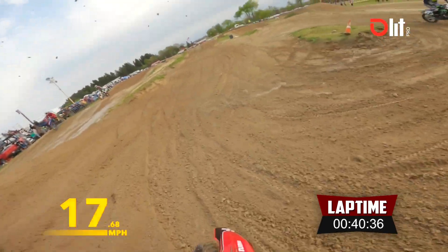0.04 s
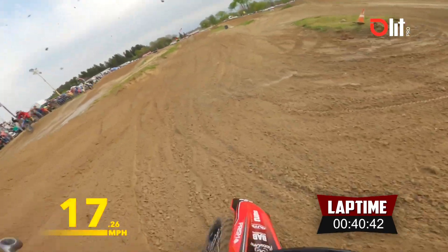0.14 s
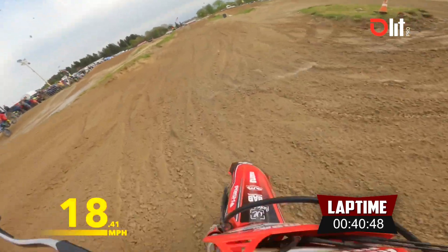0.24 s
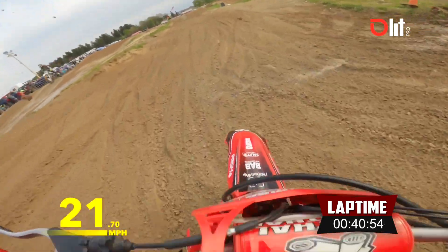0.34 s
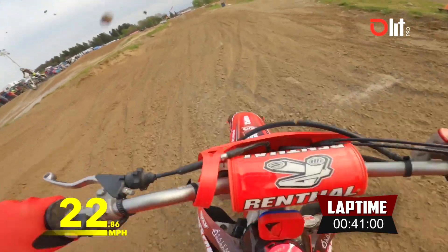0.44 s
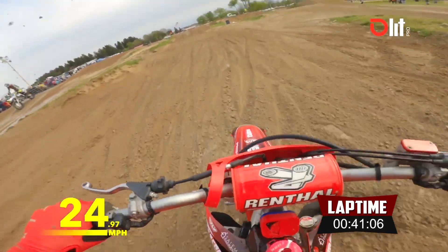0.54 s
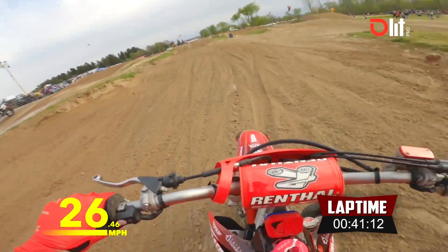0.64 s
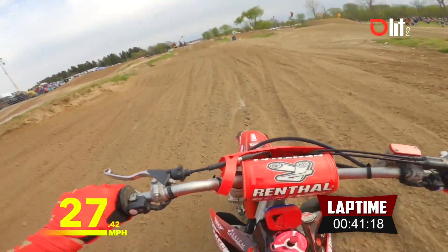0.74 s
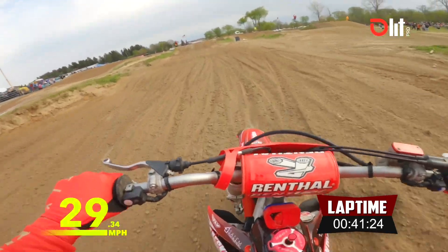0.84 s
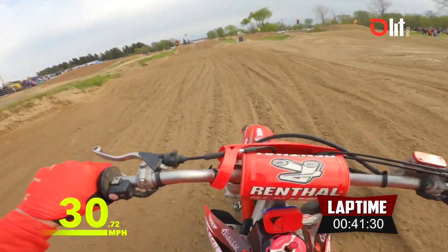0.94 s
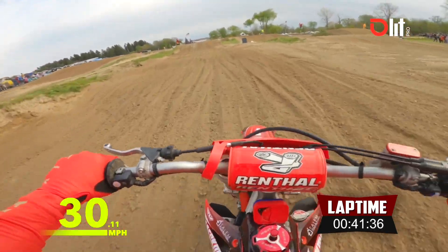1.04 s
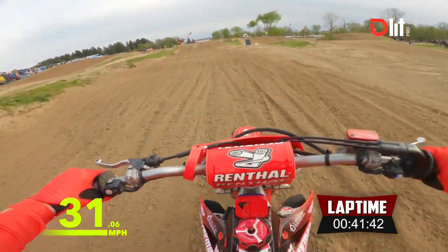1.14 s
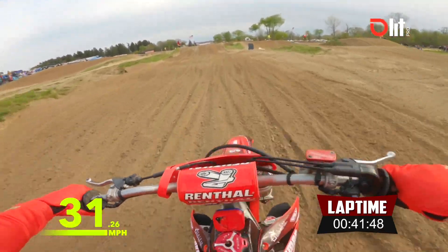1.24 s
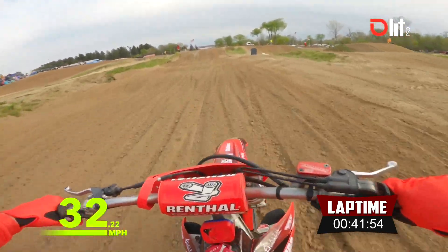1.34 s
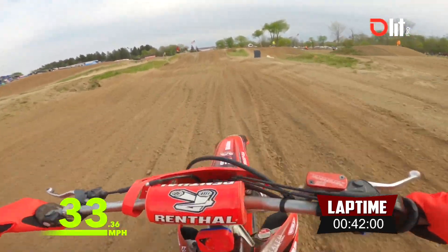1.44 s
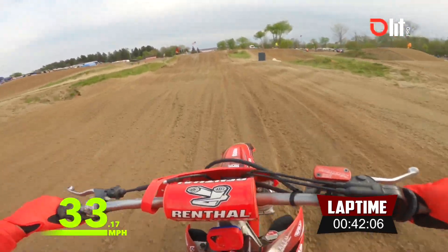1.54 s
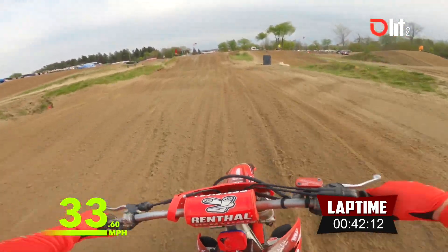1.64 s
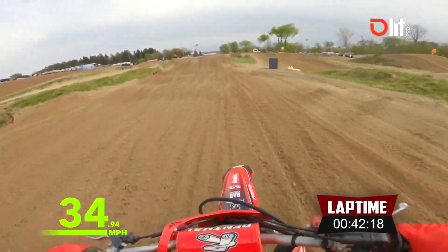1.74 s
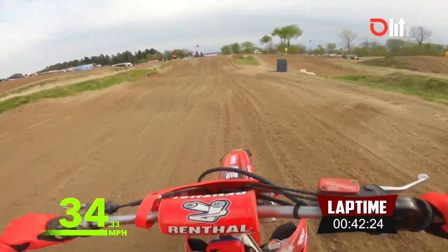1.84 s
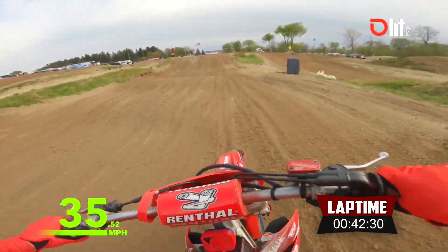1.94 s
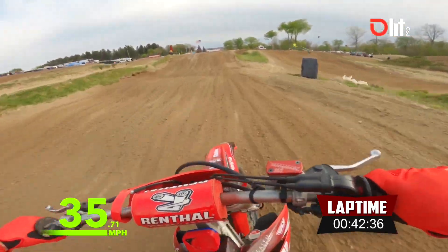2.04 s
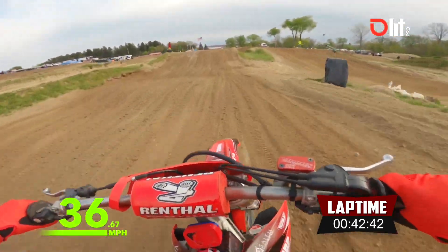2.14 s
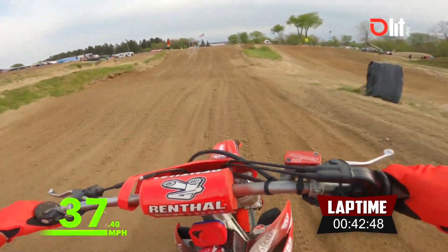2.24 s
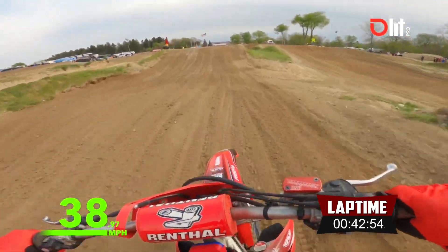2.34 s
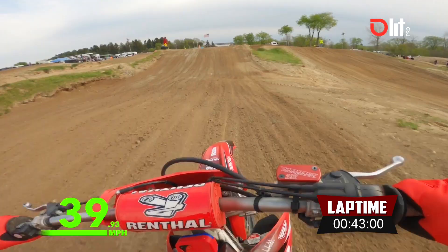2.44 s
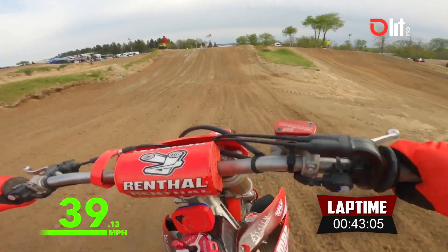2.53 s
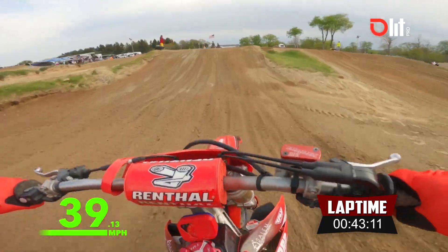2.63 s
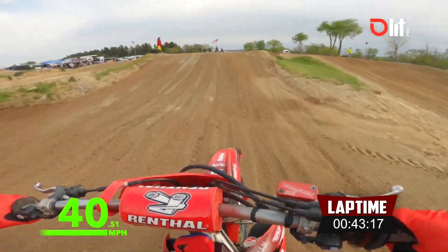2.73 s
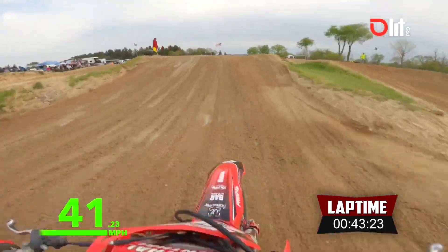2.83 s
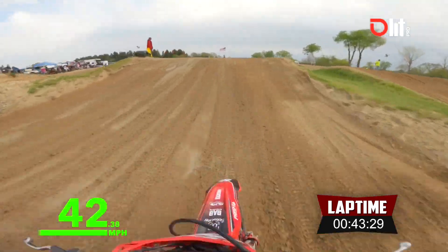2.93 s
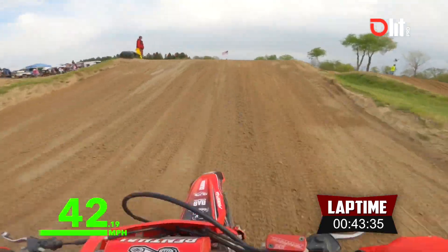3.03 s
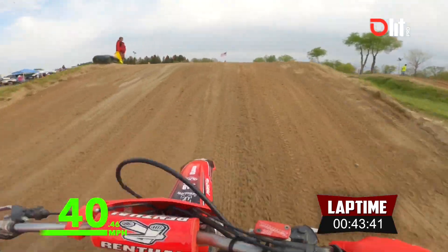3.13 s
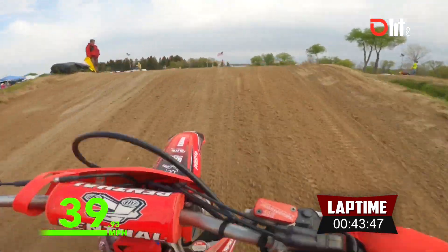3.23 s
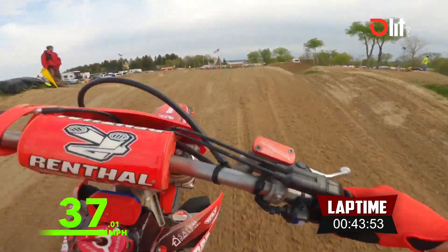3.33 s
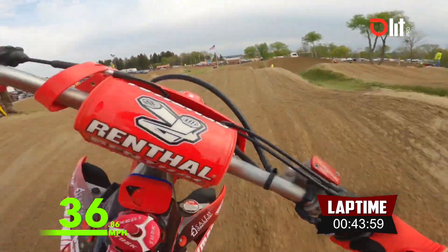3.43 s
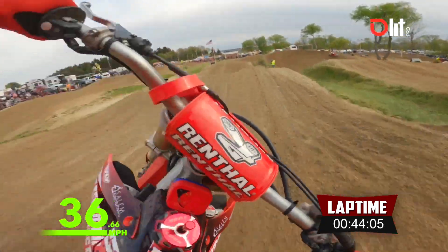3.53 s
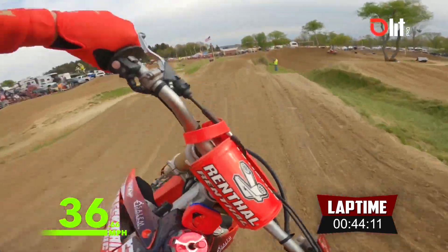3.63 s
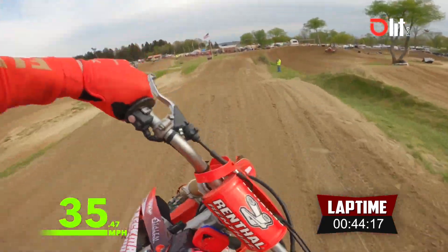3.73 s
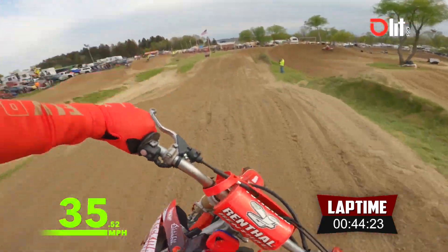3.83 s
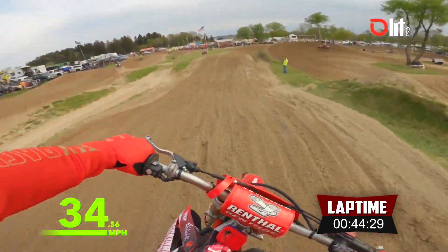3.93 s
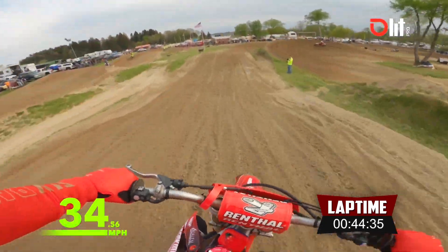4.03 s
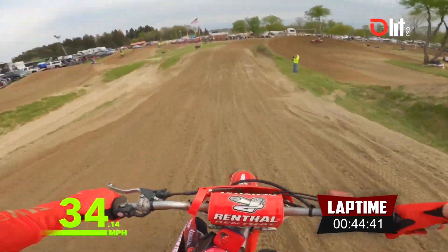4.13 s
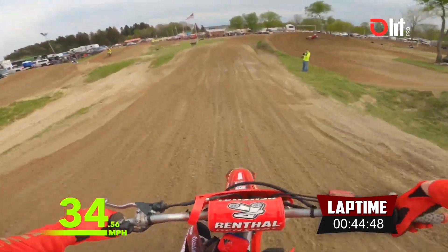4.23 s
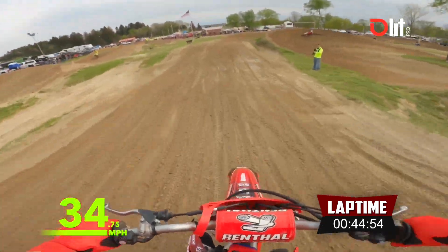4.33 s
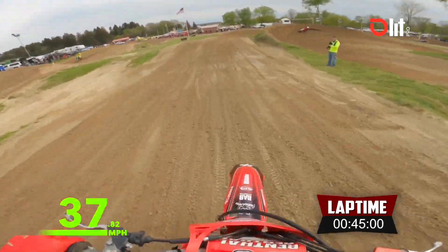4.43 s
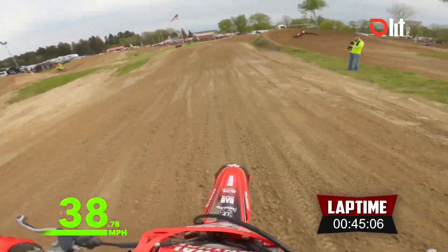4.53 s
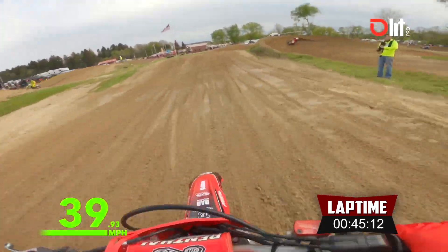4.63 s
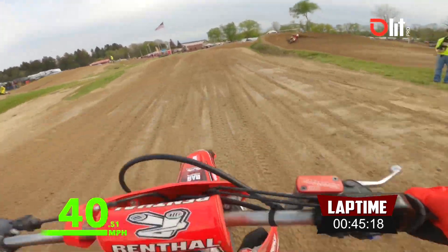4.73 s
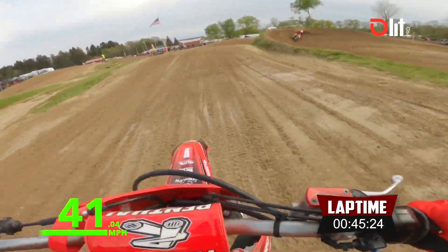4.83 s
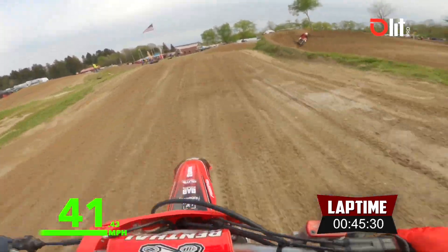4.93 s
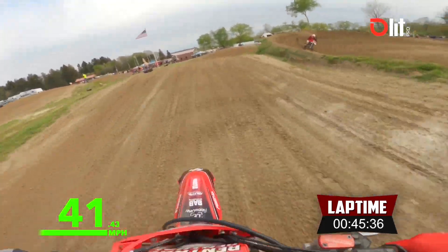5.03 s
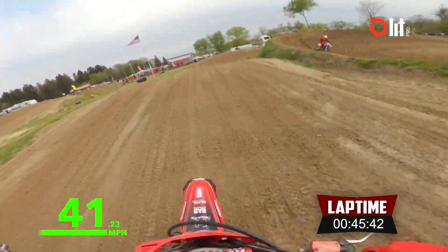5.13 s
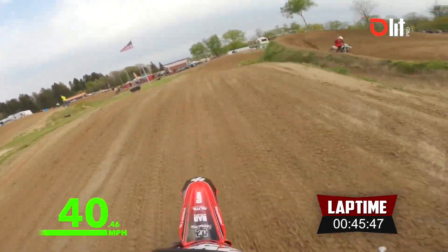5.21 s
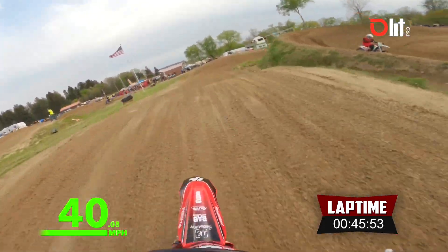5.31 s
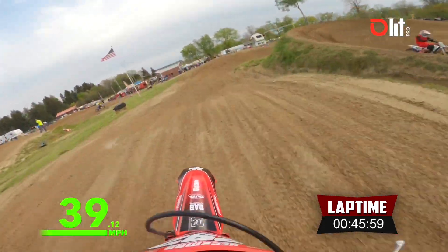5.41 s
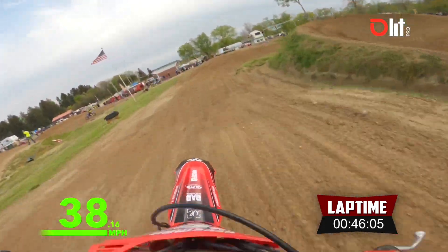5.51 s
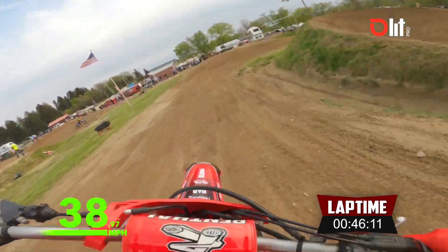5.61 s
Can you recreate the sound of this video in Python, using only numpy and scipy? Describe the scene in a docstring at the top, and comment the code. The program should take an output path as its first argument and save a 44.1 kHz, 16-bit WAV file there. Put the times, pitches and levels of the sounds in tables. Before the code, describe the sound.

From the rider's position outdoors, a loud single-cylinder dirt bike accelerates with a throaty intake honk and cracking exhaust, its pitch dropping at each shift. The throttle closes over a jump, leaving rattling metal, ringing chain and buffeting air; a sudden bark follows, then another burst of power and a coasting end.

```python
"""Motocross bike from the helmet

A four-stroke single at racing speed, as its rider hears it. Gulps of air excite the airbox resonance,
orders of the firing rate bark through the exhaust, and each firing cracks the modes of the header pipe.
The throttle shuts for gear changes, over a jump (with one blip in the air) and before a turn,
leaving clatter of struck metal, singing gears, ringing drive, filtered-noise hiss and wind."""
import sys
import numpy as np
from scipy import signal
from scipy.fft import rfft, irfft
from scipy.io import wavfile
from scipy.ndimage import uniform_filter1d, minimum_filter1d

SR = 44100
rng = np.random.default_rng(int(sys.argv[2]) if len(sys.argv) > 2 else 0)


def transcribe(signal):
    """Save signal, clipped to [-1, 1], as a 16-bit WAV file at the path in sys.argv[1]."""
    frames = np.atleast_2d(signal).T
    limited = np.clip(frames, -1, 1)
    pcm = np.round(limited * 32767).astype(np.int16)
    wavfile.write(sys.argv[1], SR, pcm)


N = 250047
TIME = np.arange(N) / SR  # s
BINS = np.fft.rfftfreq(N, 1 / SR)  # Hz


def gain_of(db):
    """Logarithmic level: decibels to amplitude."""
    return 10 ** (np.asarray(db) / 20)


def evened(x):
    """Normalisation of power: scales to rms 1."""
    return x / np.sqrt(np.mean(x ** 2) + 1e-20)


def curve(rows, axis=1):
    """Linear interpolation: one column of a time table at every sample."""
    rows = np.asarray(rows, float)
    return np.interp(TIME, rows[:, 0], rows[:, axis])


def swells_db(rows, axis=2):
    """Gaussian envelopes: one column of an event table as bell-shaped swells or dips."""
    return sum(row[axis] * np.exp(-((TIME - row[0]) / row[1]) ** 2) for row in rows)


def colour_at(points, hz):
    """Frequency response: gain of a colour table, interpolated over log frequency."""
    point_hz, db = np.transpose(points)
    return gain_of(np.interp(np.log(hz + 1), np.log(point_hz), db))


def coloured(x, points):
    """Linear filtering: shapes the spectrum by a colour table; rms 1."""
    return evened(irfft(rfft(x) * colour_at(points, BINS), N))


def wander(hz):
    """Low-passed noise: slow chance up to about the given rate; rms 1."""
    noise = rfft(rng.standard_normal(N))
    return evened(irfft(noise / (1 + (BINS / hz) ** 4), N))


def once_a_cycle(cycles, at, spread):
    """Periodic gating: a smooth window at one angle of the engine cycle (shares of a cycle)."""
    return np.exp((np.cos(2 * np.pi * (cycles - at)) - 1) / (2 * np.pi * spread) ** 2)


def blows(cycles, at, uneven_db):
    """Impulse train: one click per engine cycle at the given angle, each of its own strength."""
    count = np.floor(cycles - at)
    where = np.flatnonzero(np.diff(count) > 0)
    size = gain_of(uneven_db * rng.standard_normal(len(where)))
    # each click falls between two samples, which share it
    late = (count[where + 1] + at - cycles[where]) / (cycles[where + 1] - cycles[where])
    clicks = np.zeros(N)
    clicks[where], clicks[where + 1] = size * (1 - late), size * late
    return clicks


def metal(clicks, t60):
    """Dense modal decay: clicks ring a casting or pipe as fading noise (t60 in seconds)."""
    t = TIME[:SR // 20]
    ring = rng.standard_normal(len(t)) * gain_of(-60 * t / t60)
    return evened(signal.oaconvolve(clicks, ring)[:N])


# Speed of the engine. Each row: time in seconds, firings per second.
FIRING_RATE = [(0.0, 82.7), (0.16, 89.3), (0.41, 83.6), (0.47, 91), (0.54, 91.5), (0.63, 89.4),
               (0.69, 98.6), (0.76, 92), (0.91, 99.3), (0.96, 96), (1.06, 103), (1.2, 92.4), (1.26, 67),
               (1.28, 69.6), (1.32, 72.3), (1.39, 82.6), (1.55, 80.5), (1.58, 86), (1.64, 80.6),
               (1.74, 86.4), (1.77, 75), (1.8, 73), (1.81, 65), (1.86, 84), (1.88, 76.5), (1.94, 68.8),
               (2.08, 69.7), (2.16, 77), (2.26, 79.5), (2.3, 84.4), (2.38, 80.9), (2.45, 91.7), (2.59, 87),
               (2.62, 82.4), (2.73, 88), (2.87, 94.3), (2.97, 108), (3.0, 114.4), (3.11, 83.5), (3.14, 79),
               (3.24, 75.1), (3.4, 71.7), (3.9, 55.8), (3.96, 51.4), (4.01, 61), (4.07, 62), (4.14, 84),
               (4.18, 91.4), (4.25, 105), (4.28, 105.7), (4.5, 92.1), (4.56, 103), (4.61, 100), (4.74, 76),
               (5.04, 84.2), (5.16, 90.6), (5.24, 75.6), (5.37, 71.4), (5.46, 73.5), (5.67, 67.6)]
CRUISE_HZ = 80  # firings per second at which the levels hold


def revs():
    """Logarithmic pitch: engine speed in octaves above cruising."""
    return np.log2(np.maximum(curve(FIRING_RATE), 1) / CRUISE_HZ)


SWEEP = .33  # up to order seven, each order comes this share of a cycle after the one below


def order_angle(cycles, firing_hz, k):
    """Dispersion: ducts smear the low orders into an upward sweep; at low revs the pulses stay apart."""
    fill = np.minimum(firing_hz / 76, 1) ** 2
    return 2 * np.pi * (k * cycles - fill * SWEEP / 2 * (min(k, 7) - 3.6) ** 2)


# Holds of the throttle: out of the turn, through the gears (changes near 1.2, 1.8 s), up the jump face
# (2.9 s), a blip in the air (4.0 s), landing (4.5 s). Each row: start in seconds, end in seconds,
# intake level in dB, its swell over the hold in dB, exhaust level at cruising revs (before trim) in dB,
# rasp level in dB, piston thud level at cruising revs in dB.
THROTTLE_HOLDS = [(-.1, 0.457, -3.5, 1.5, -25, -32.5, -18.5), (0.425, 1.15, -5, 2.5, -23.5, -30.5, -25.5),
                  (1.174, 1.302, -18.5, 0.5, -35, -70, -28), (1.308, 1.708, -7.5, -2, -28.5, -28, -24),
                  (1.738, 1.861, -14.5, 0, -36, -50, -27.5), (1.87, 2.417, -8, -0.5, -27.5, -27, -28),
                  (2.42, 2.91, -5, 1.5, -27.5, -27, -35), (2.921, 3.115, -10, -7.5, -22, -28.5, -19.5),
                  (3.73, 3.99, -13.5, -1.5, -36, -34, -35.5), (4.0, 4.11, -0.5, 0, -10.5, -49, -27),
                  (4.103, 4.236, -4.5, 4.5, -19, -50, -29), (4.247, 4.51, -17.5, 1, -32, -58, -31.5),
                  (4.521, 4.699, -8, -4, -32, -31.5, -23), (4.698, 5.134, -5.5, -2, -22.5, -29, -25.5),
                  (5.239, 5.357, -18.5, 3, -33.5, -50, -36)]
SHUT_INTAKE_DB, SHUT_EXHAUST_DB, SHUT_RASP_DB, SHUT_THUD_DB = -22.5, -43.5, -45.5, -27.5
OPEN_S, SHUT_S = 0.033, 0.036  # time the twist grip takes


def throttled(levels_db, shut_db):
    """Envelope control: moves from the shut level to that of each hold and back, as the grip turns."""
    grips = []
    for start, stop, *_ in THROTTLE_HOLDS:
        turn = np.minimum((TIME - start) / OPEN_S, (stop - TIME) / SHUT_S)
        grips.append(np.clip(turn + .5, 0, 1))
    rise_db = sum(grip * (db - shut_db) for grip, db in zip(grips, levels_db))
    return shut_db + rise_db / np.maximum(sum(grips), 1)  # overlapping holds are averaged


def held_db(shut_db, axis):
    """Envelope control: one level column of the throttle table at every sample."""
    return throttled(np.take(THROTTLE_HOLDS, axis, 1), shut_db)


def intake_db():
    """Envelope control: the intake swells or sags steadily through each hold."""
    holds = [db + swell * ((TIME - start) / (stop - start) - .5)
             for start, stop, db, swell, *_ in THROTTLE_HOLDS]
    return throttled(holds, SHUT_INTAKE_DB)


def engine_load(pull_from_db=-21.5, pull_range_db=10):
    """Load from intake level: 0 coasting to 1 pulling hard."""
    return np.clip((intake_db() - pull_from_db) / pull_range_db, 0, 1)


# Resonance of the airbox. Each row: time in seconds, frequency in Hz, sharpness Q (no unit).
AIRBOX_RESONANCE = [(0, 290.3, 2), (.38, 300, 2.4), (.55, 249.6, 1.46), (1.08, 251, 2.34),
                    (1.28, 225, 0.94), (1.6, 244.5, 1.26), (1.82, 202, 1.14), (2.15, 246.5, 1.1),
                    (2.82, 255.9, 1.15), (2.98, 211, 0.37), (3.1, 263.9, 1.6), (3.96, 184.6, 1.52),
                    (4.01, 318.6, 0.89), (4.22, 280, 1.14), (4.3, 188, 1.44), (4.49, 187.6, 0.73),
                    (4.535, 304.8, 0.84), (4.66, 239, 0.79), (4.84, 288.6, 2.5), (5.1, 273.5, 1.22),
                    (5.22, 225.3, .9), (5.67, 213, 1.2)]


def intake(cycles, firing_hz, rough=0.12, coasting_db=-42, count=9):
    """Resonance: one suction gulp a cycle; the airbox passes the few orders near its own frequency."""
    box_hz, q = curve(AIRBOX_RESONANCE), curve(AIRBOX_RESONANCE, axis=2)
    honk, power = np.zeros(N), np.zeros(N)
    for k in range(2, count):
        detune = q * (k * firing_hz / box_hz - box_hz / (k * firing_hz))
        height = 1 / (1 + detune ** 2) ** 2
        honk -= height * np.cos(order_angle(cycles, firing_hz, k))
        power += height ** 2 / 2
    # gulps differ in strength, most of all on a shut throttle
    strength = gain_of(intake_db()) * (1 + rough * wander(40))
    strength += gain_of(coasting_db) * wander(45)
    return honk / np.sqrt(power) * strength


def exhaust_db(db_per_octave=9):
    """Source strength: the exhaust follows the throttle and grows with the revs."""
    return held_db(SHUT_EXHAUST_DB, axis=4) + db_per_octave * revs()


def thud_db(load, lugging_db_per_octave=25):
    """Source strength: the piston thuds hardest when the engine pulls at low revs."""
    return held_db(SHUT_THUD_DB, axis=6) - lugging_db_per_octave * load * revs()


def boom_db(load, coasting_db=-23.5, pulling_db=-52, settle_s=0.078):
    """Delayed release: the pipe booms once the throttle has been shut for a moment."""
    fall = TIME / settle_s
    recent_load = np.maximum.accumulate(load + fall) - fall
    return coasting_db + (pulling_db - coasting_db) * recent_load


# Response of the exhaust and silencer. Each row: frequency in Hz, relative level in dB.
SILENCER_COLOUR = [(100, 3), (135, 10), (175, 8), (350, -33), (420, -14.5), (490, -2.5), (570, -11),
                   (660, -5), (780, -17.5), (1000, -27.5), (1400, -37.5)]


def exhaust(cycles, firing_hz, load, trim_db=-3, rough=0.019, sway_db=5.0,
            boom_hz=365, boom_width_hz=45, count=17):
    """Harmonic synthesis: firing orders through the silencer; unloaded, one pipe resonance booms."""
    uneven = cycles + .002 * wander(40)
    bark = gain_of(exhaust_db() + trim_db) * (1 + rough * wander(32))
    boom = gain_of(boom_db(load))
    note = gain_of(thud_db(load)) * np.sin(2 * np.pi * cycles)  # piston thud
    for k in range(2, count):
        hz = k * firing_hz
        height = bark * colour_at(SILENCER_COLOUR, hz) * gain_of(sway_db * wander(8.8))
        height += boom / (1 + ((hz - boom_hz) / boom_width_hz) ** 4)
        note -= height * np.sin(order_angle(uneven, firing_hz, k))
    return note


# Spectrum of the crack and puff. Each row: frequency in Hz, relative level in dB.
CRACK_COLOUR = [(200, -26), (600, 13.5), (1000, 10), (3600, -4.5), (5000, -4.5), (8000, -27), (14000, -58)]
# Modes of the header pipe. Each row: frequency in Hz, width in Hz, relative level at full load in dB,
# growth in dB per dB of rasp.
HEADER_MODES = [(679.2, 44, -6.5, 6.5), (1105, 220, -13, 2), (1388, 130, -3, 3), (1666, 97, -5.5, 0.84),
                (1885, 83, -11.5, 0.5), (2490, 300, -17.5, 0), (3220, 250, -13, 5)]


def rasp(cycles, full_load_db=-27, gas_db=-8, slap_db=-9, slap_uneven_db=2, puff_spread=.16):
    """Modal excitation: each firing cracks the pipe modes, with a puff of gas and a weaker second slap."""
    crack = evened(blows(cycles, at=0.0565, uneven_db=0.4))
    slap = evened(blows(cycles, at=0.36, uneven_db=slap_uneven_db))
    puff = evened(once_a_cycle(cycles, at=0.097, spread=puff_spread) * rng.standard_normal(N))
    blast = crack + gain_of(slap_db) * slap + gain_of(gas_db) * puff
    spectrum = rfft(blast) * colour_at(CRACK_COLOUR, BINS)
    load_db = held_db(SHUT_RASP_DB, axis=5) - full_load_db
    out = np.zeros(N)
    # modes with little growth still buzz at part throttle
    for hz, width, db, growth in HEADER_MODES:
        mode = evened(irfft(spectrum / (1 + 2j * (BINS - hz) / width), N))
        out += gain_of(db + growth * load_db) * mode
    return gain_of(full_load_db) * out


# Swells and dips of the drive sounds: pulling out of the turn, in gear changes, off the jump,
# after the blip, on landing and into the turn. Each row: time in seconds, half length in seconds,
# ring change in dB, whine change in dB, clatter change in dB, hiss change in dB.
DRIVE_SWELLS = [(.3, .3, 2, 5.5, 0, -2.5), (1.17, 0.031, -4, -1, 0.5, 4), (1.87, .025, 6, 0.5, 4, -1),
                (3.38, .16, 7, -3.5, 0.5, 1), (3.57, 0.22, 0, 10, 3.5, 2.5), (4.4, 0.097, 3, 11.5, 2, 5),
                (4.62, .05, 1, 7, 1, 0.5), (5.5, .25, -0.5, 3, 0.5, -2)]


def drive_swell_db(axis):
    """Level modulation: how much one sound of the drive swells or dips at these moments."""
    return swells_db(DRIVE_SWELLS, axis=axis)


def clatter_db(load, cruise_db=-29.5, db_per_octave=3, pulling_db=2.0):
    """Source strength: clatter grows with revs and load."""
    return cruise_db + db_per_octave * revs() + pulling_db * load + drive_swell_db(axis=4)


# Spectrum of the engine clatter. Each row: frequency in Hz, relative level in dB.
ENGINE_COLOUR = [(150, -6.5), (400, 10), (800, 4.5), (1250, 6.5), (1500, 6), (1800, 5.5), (2300, 3.5),
                 (2800, 1.5), (3500, 0), (4300, -7), (5300, -16), (8000, -21), (14000, -51)]


def clatter(cycles, load, rush_db=1, count=4):
    """Impact sound: valves and piston knock at four angles of the cycle, over the rush of gears."""
    knocks = np.zeros(N)
    for k in range(count):
        knocks += metal(blows(cycles, at=k / count + 0.0991, uneven_db=0.5), t60=0.067)
    rush = rng.standard_normal(N) * gain_of(2.3 * wander(90))
    mixed = evened(knocks) + gain_of(rush_db) * rush
    return gain_of(clatter_db(load)) * coloured(mixed, ENGINE_COLOUR)


def whine_db(load, coasting_db=-39, db_per_octave=5, pulling_db=-3):
    """Source strength: the gears sing louder with revs and softer under load."""
    return coasting_db + db_per_octave * revs() + pulling_db * load + drive_swell_db(axis=3)


# Orders of the meshing gears. Each row: multiple of the firing rate (no unit), relative level in dB.
MESH_ORDERS = [(12, -2), (14, -4), (17, -3), (18, 0), (19, -2), (23, -2), (24, -5), (28, -5), (32, -6),
               (38, -8), (43, -6), (46, -11)]


def whine(cycles, load, flutter=0.95, slack=0.076, flutter_hz=5, slip_hz=22):
    """Gear meshing: teeth sing at high orders of the firing rate; backlash makes each line flutter."""
    lines = np.zeros(N)
    for k, db in MESH_ORDERS:
        height = gain_of(db) * (1 + flutter * wander(flutter_hz))
        phase = k * cycles + slack * wander(slip_hz) + rng.random()
        lines += height * np.sin(2 * np.pi * phase)
    return gain_of(whine_db(load)) * evened(lines)


def ring_db(load, coasting_db=-38, pulling_db=-3):
    """Damping: a chain pulled taut by load quiets the ringing of the drive."""
    return coasting_db + pulling_db * load + drive_swell_db(axis=2)


# Modes of sprockets and cases. Each row: frequency in Hz, width in Hz, relative level in dB.
SPROCKET_MODES = [(1220, 23, -5.5), (1740, 89, 9.5), (4296, 140, 1), (4390, 140, -1), (6600, 110, -32),
                  (7620, 150, -38.5)]


def drive_ring(cycles, load, chain_db=-2, knock_uneven_db=1.5):
    """Modal resonance: knocks of the drive and chain noise ring the sprockets and cases."""
    modes = sum(gain_of(db) / (1 + 2j * (BINS - hz) / width) ** 2 for hz, width, db in SPROCKET_MODES)
    knocks = evened(blows(cycles, at=.4, uneven_db=knock_uneven_db))
    rattle = knocks + gain_of(chain_db) * rng.standard_normal(N)
    return gain_of(ring_db(load)) * evened(irfft(rfft(rattle) * modes, N))


def hiss_db(load, cruise_db=-44, db_per_octave=4, pulling_db=1.0):
    """Source strength: chain and tyres hiss more with revs and load."""
    return cruise_db + db_per_octave * revs() + pulling_db * load + drive_swell_db(axis=5)


# Spectrum of chain and tyre hiss. Each row: frequency in Hz, relative level in dB.
CHAIN_COLOUR = [(500, -21), (2000, -6.5), (5000, 6), (5600, 0.5), (6400, 0.5), (7900, -5), (9000, -14.5),
                (10800, -20), (12400, -18.5), (14000, -26), (15500, -28.5)]


def hiss(cycles, load, throb=0.23, flicker_db=1.0):
    """Amplitude modulation: fine noise throbs a little with the engine."""
    pulse = 1 + throb * once_a_cycle(cycles, at=.05, spread=0.14)
    noise = rng.standard_normal(N) * pulse * gain_of(flicker_db * wander(120))
    return gain_of(hiss_db(load)) * coloured(noise, CHAIN_COLOUR)


# Speed over the ground. Each row: time in seconds, speed in miles per hour.
GROUND_SPEED = [(0, 16), (.75, 27), (3, 43), (4.1, 33), (5, 41), (5.67, 38)]
CRUISE_MPH = 38  # ground speed at which the wind level holds


def pace():
    """Logarithmic speed: ground speed in octaves above cruising."""
    return np.log2(curve(GROUND_SPEED) / CRUISE_MPH)


# Gusts on the helmet. Each row: time in seconds, half length in seconds, rise in dB.
HELMET_GUSTS = [(1.78, .06, 7.5), (3.27, .04, 2.5), (3.69, .13, 5.5), (5.24, 0.07, 4.5), (5.59, 0.064, 5.5)]


def wind_db(load, cruise_db=-26, db_per_octave=4, pulling_db=-3):
    """Flow noise: wind grows with ground speed, is stronger while the bike coasts, and gusts."""
    return cruise_db + db_per_octave * pace() + pulling_db * load + swells_db(HELMET_GUSTS)


# Spectrum of the buffeting. Each row: frequency in Hz, relative level in dB.
BUFFET_COLOUR = [(10, -6), (28, -1.5), (50, -1.5), (90, 1), (140, -1), (200, -2.5), (280, -4.5), (420, -12),
                 (800, -36), (2000, -58)]


def wind(load):
    """Turbulence: low-frequency noise buffets the helmet."""
    return gain_of(wind_db(load)) * coloured(rng.standard_normal(N), BUFFET_COLOUR)


# Ragged firings as the throttle snaps open or the revs flare.
# Each row: time in seconds, half length in seconds, level in dB.
RAGGED_FIRINGS = [(1.285, .015, -28), (1.862, 0.024, -21.5), (3.001, 0.069, -26), (4.017, 0.022, -13.5),
                  (4.096, 0.073, -22), (4.565, .05, -26)]
# Their spectrum. Each row: frequency in Hz, relative level in dB.
RAGGED_COLOUR = [(150, -20), (330, 5), (560, 0), (800, -14.5), (1300, -18), (1900, -18.5), (4000, -26.5),
                 (9000, -60)]


def sputter(cycles):
    """Pulsed jet noise: uneven burns puff out of the silencer, one a cycle."""
    level = sum(gain_of(db) * np.exp(-((TIME - s) / half) ** 2) for s, half, db in RAGGED_FIRINGS)
    puffs = once_a_cycle(cycles, at=.1, spread=0.37) * rng.standard_normal(N)
    return level * coloured(puffs, RAGGED_COLOUR)


def scene():
    """Superposition: engine sounds share one throttle and one crank, whose speed wavers slightly."""
    firing_hz = curve(FIRING_RATE) * (1 + 0.003017 * wander(25.75))
    cycles = np.cumsum(firing_hz) / SR
    load = engine_load()
    gas = intake(cycles, firing_hz) + exhaust(cycles, firing_hz, load) + rasp(cycles)
    machinery = clatter(cycles, load) + whine(cycles, load) + drive_ring(cycles, load)
    air = hiss(cycles, load) + wind(load)
    return (gas + machinery + air + sputter(cycles))[None]


def gain_control(x, threshold_db=-9.0, ratio=9, recovery_db_per_s=130):
    """Compression: turns everything down while the sum is loud, and recovers quickly."""
    power = uniform_filter1d(uniform_filter1d(x ** 2, size=800), size=550)
    power_db = 10 * np.log10(abs(power) + 1e-12)
    fall = TIME * recovery_db_per_s
    recent_db = np.maximum.accumulate(power_db + fall) - fall
    over_db = np.maximum(recent_db - threshold_db, 0)
    return x * gain_of(-over_db * (1 - 1 / ratio))


def record(dry, ceiling=.78, edge_hz=15700):
    """Dynamic range and bandwidth: gain control, a quick peak limiter, then a low-pass filter."""
    ducked = gain_control(dry[0])
    allowed = np.minimum(1, ceiling / (abs(ducked) + 1e-9))
    held = ducked * uniform_filter1d(minimum_filter1d(allowed, size=700), size=700)
    low_pass = signal.firwin(511, edge_hz, window=("kaiser", 9), fs=SR)
    return signal.oaconvolve(held, low_pass, "same")[None]


dry = scene()
out = record(dry)
transcribe(out)
```